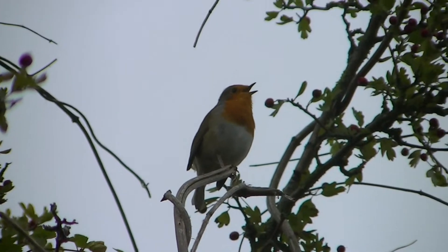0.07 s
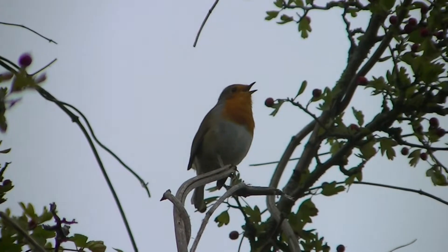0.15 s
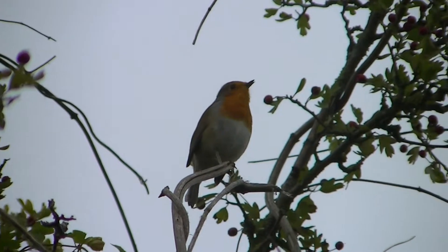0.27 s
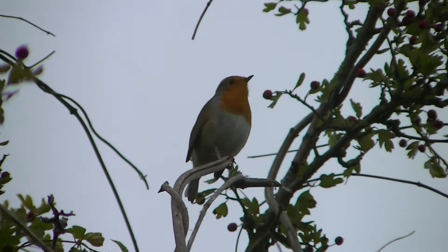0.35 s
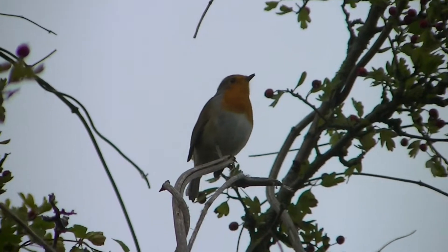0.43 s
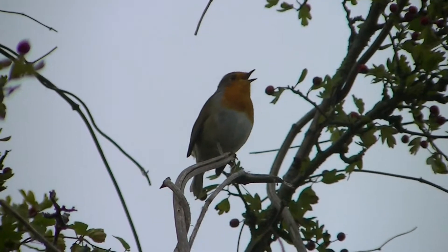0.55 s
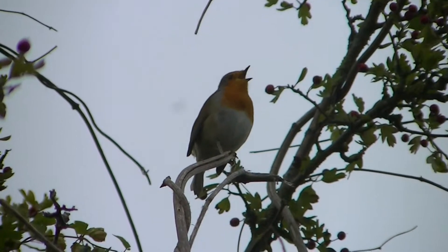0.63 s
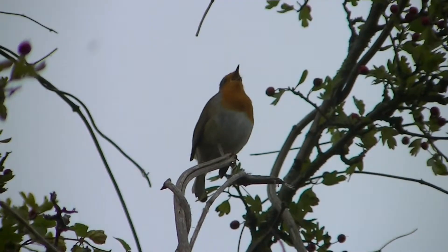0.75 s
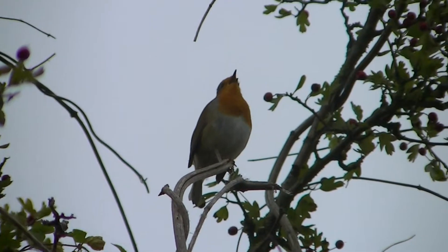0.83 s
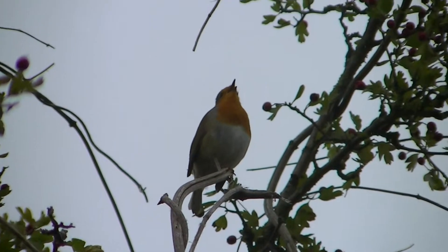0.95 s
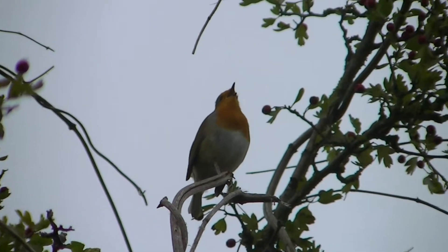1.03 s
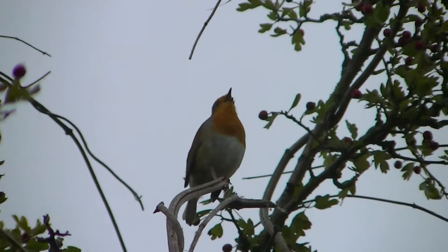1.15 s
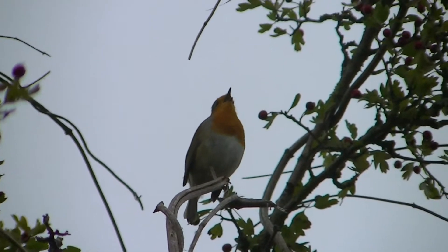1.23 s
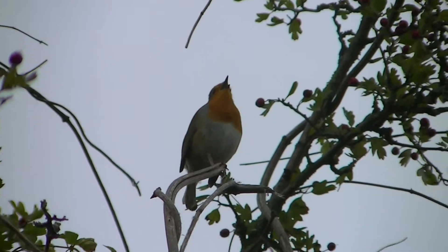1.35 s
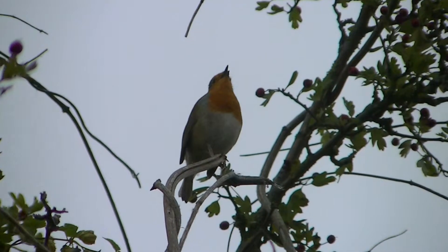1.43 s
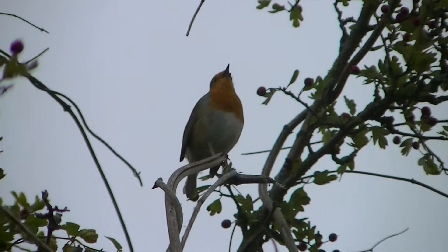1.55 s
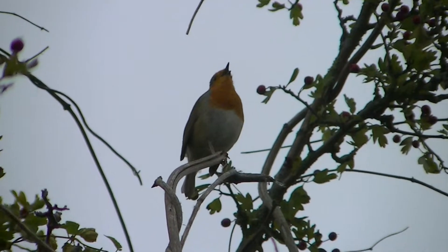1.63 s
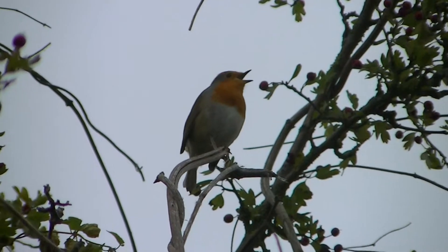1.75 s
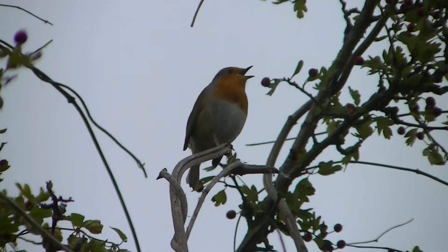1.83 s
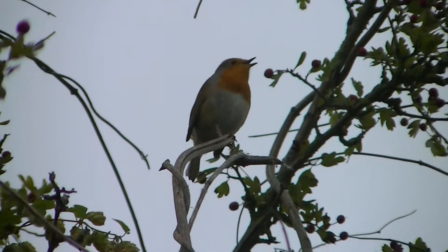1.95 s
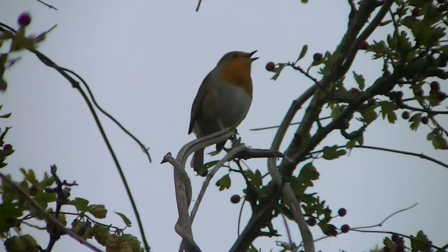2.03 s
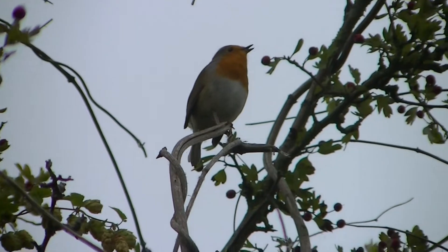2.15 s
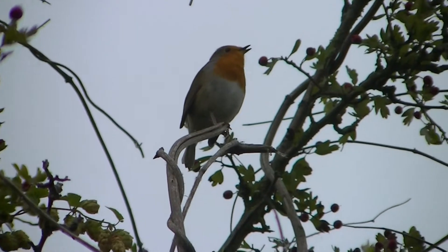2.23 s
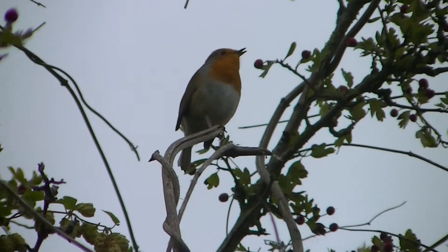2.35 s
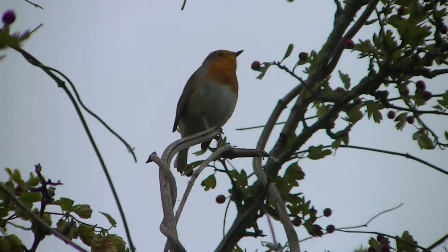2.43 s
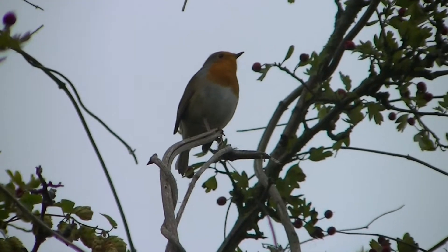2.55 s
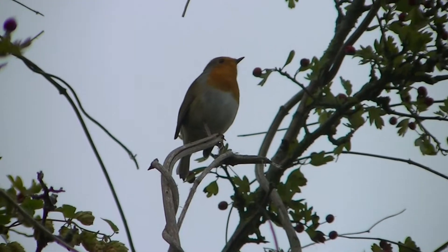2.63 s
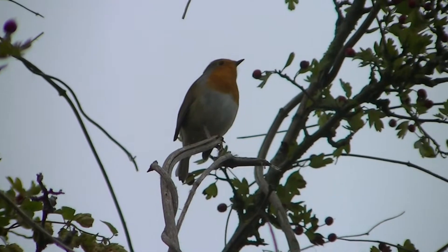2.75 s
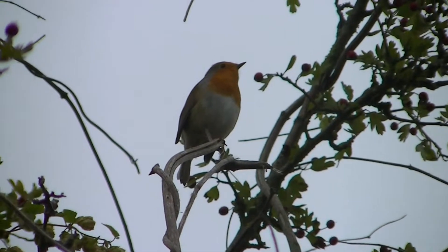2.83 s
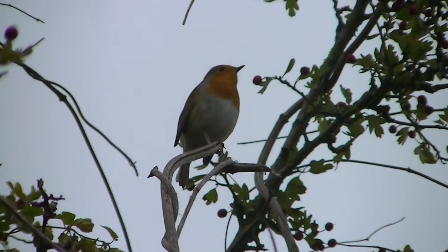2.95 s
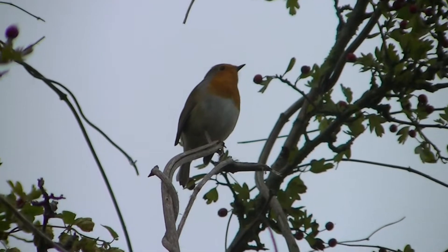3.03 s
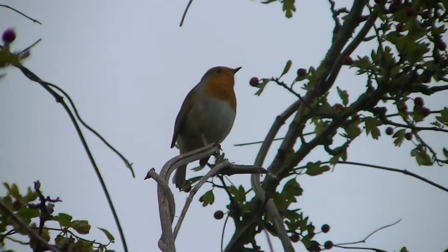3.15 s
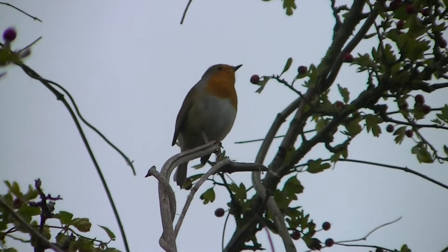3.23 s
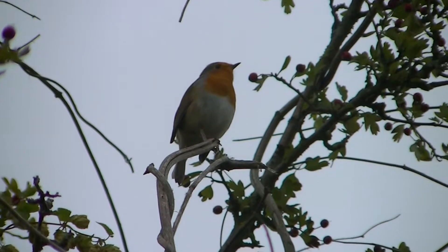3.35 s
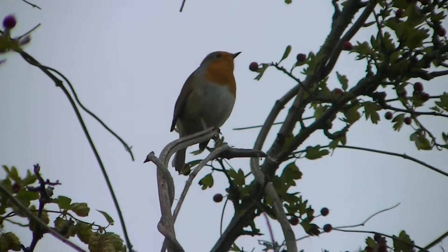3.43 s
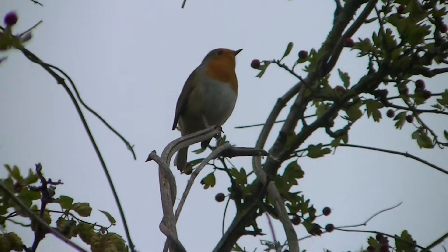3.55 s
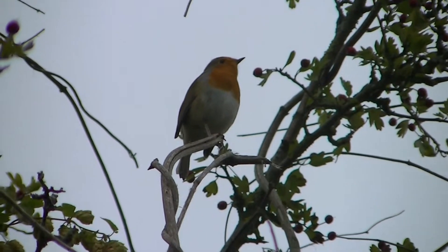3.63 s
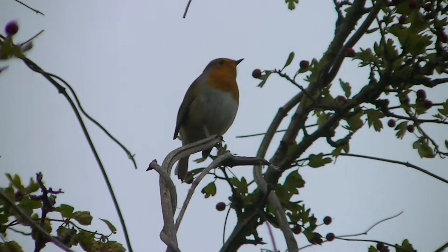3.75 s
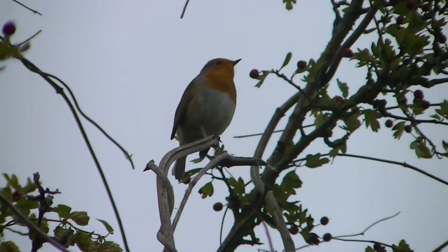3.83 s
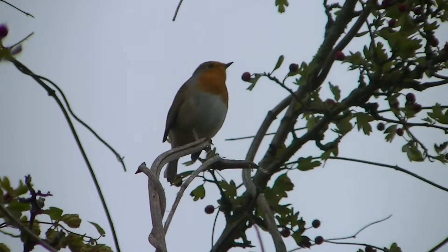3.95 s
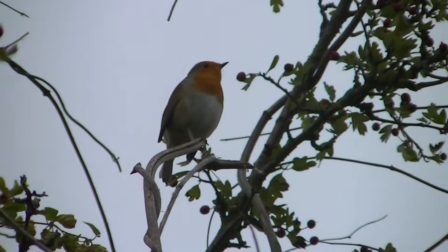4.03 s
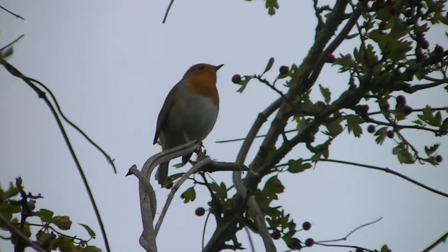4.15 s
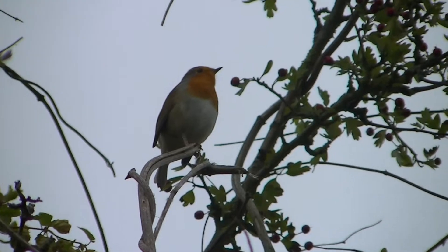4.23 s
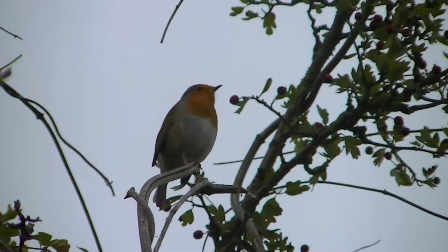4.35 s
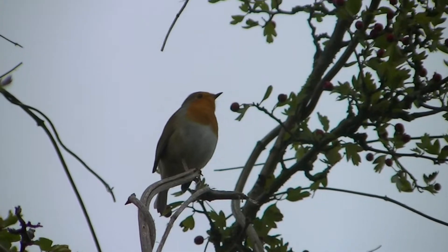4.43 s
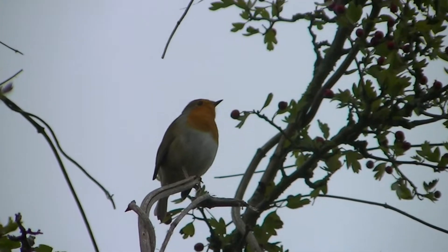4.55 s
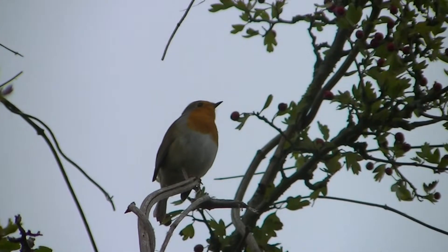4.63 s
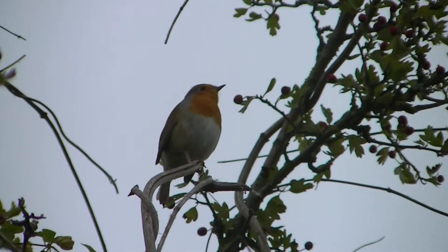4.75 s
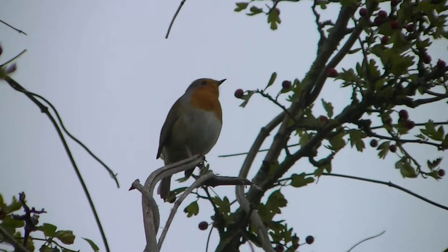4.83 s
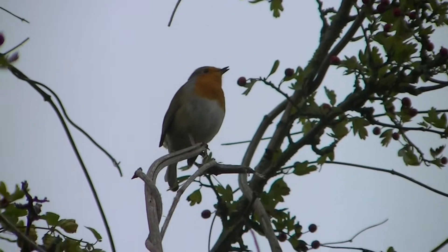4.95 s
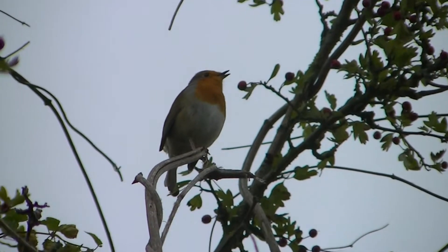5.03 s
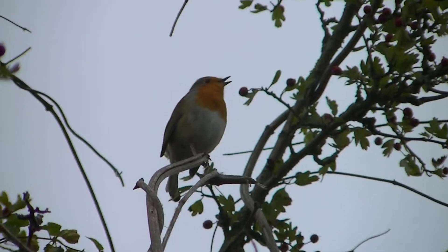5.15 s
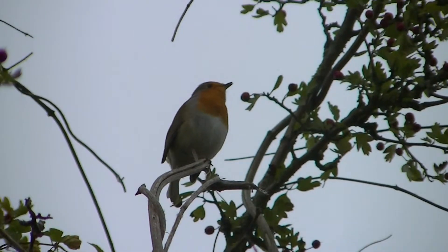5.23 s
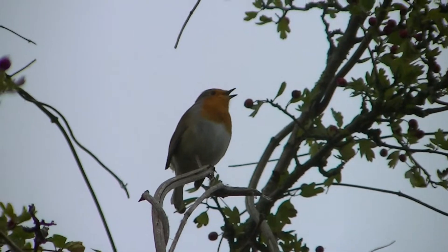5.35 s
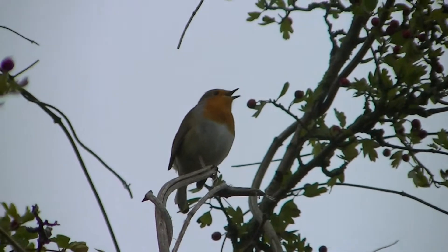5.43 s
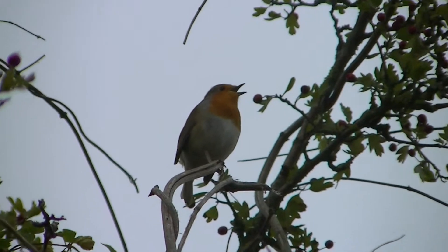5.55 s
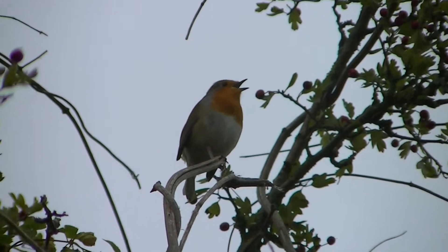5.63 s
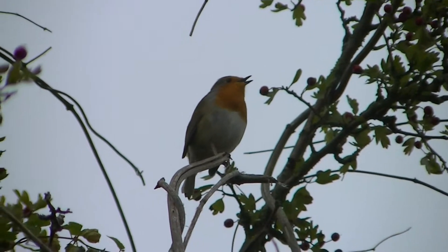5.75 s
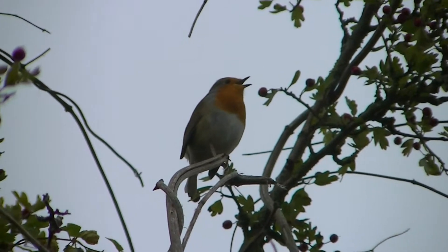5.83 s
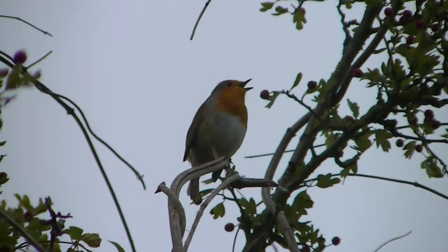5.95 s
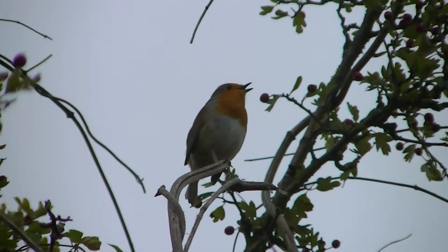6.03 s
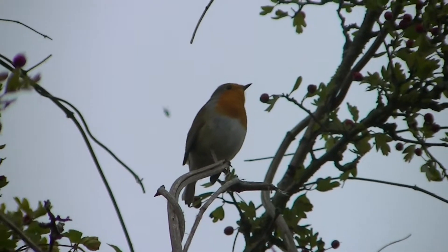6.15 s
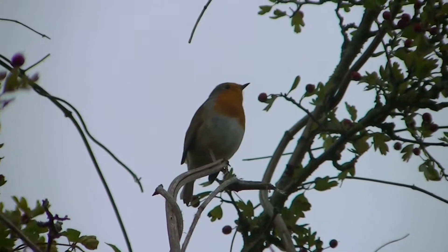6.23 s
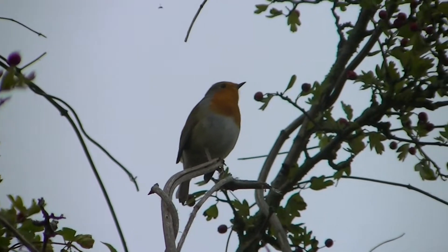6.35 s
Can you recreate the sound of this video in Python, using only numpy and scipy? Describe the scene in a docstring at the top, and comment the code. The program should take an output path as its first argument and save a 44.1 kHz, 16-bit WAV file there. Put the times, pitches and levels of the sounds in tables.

```python
"""Robin singing from a hedge

A robin sings a short chatter, a long two-voiced warble, a pause, then a thin, very high phrase.
Its syrinx whistles in short glides, rotating phasors that join or overlap; hard driving adds rasp, overtones, fizz.
Delayed echoes and decaying random taps stand for the ground, branches and twigs that throw the song back.
Filtered noise makes a nearly steady rush like far traffic and a fine hiss.
Faint ticks (filtered snaps) and blurred distant chirps (the same whistles) are heard mostly in the pause."""
import sys
import numpy as np
from scipy import signal
from scipy.fft import rfft, irfft
from scipy.io import wavfile
from scipy.ndimage import uniform_filter1d

SR = 44100
rng = np.random.default_rng(int(sys.argv[2]) if len(sys.argv) > 2 else 0)


def transcribe(signal):
    """Save signal, clipped to [-1, 1], as a 16-bit WAV file at the path in sys.argv[1]."""
    frames = np.atleast_2d(signal).T
    limited = np.clip(frames, -1, 1)
    pcm = np.round(limited * 32767).astype(np.int16)
    wavfile.write(sys.argv[1], SR, pcm)


N = 281358
TIME_S = np.arange(N) / SR


def gain_of(db):
    """Decibels to amplitude."""
    return 10 ** (np.asarray(db) / 20)


def evened(x):
    """Scales to an rms of one."""
    return x / np.sqrt(np.mean(abs(x) ** 2) + 1e-20)


def read(points, hz):
    """Reads a spectrum on a log-frequency axis."""
    point_hz, value = np.transpose(points)
    return np.interp(np.log(hz + 1), np.log(point_hz + 1), value)


def follow(points):
    """Reads a time curve at every sample."""
    return np.interp(TIME_S, *np.transpose(points))


def add(mix, start_s, sound):
    """Mixes a sound in at start_s, or at zero if that is negative."""
    part = mix[max(round(start_s * SR), 0):][:len(sound)]
    part += sound[:len(part)]


def band(x, low_hz, high_hz, order=2):
    """Butterworth band-pass."""
    edges_hz = [low_hz, min(high_hz, SR / 2 - 1)]
    return signal.sosfilt(signal.butter(order, edges_hz, "band", fs=SR, output="sos"), x)


def colour(x, spectrum):
    """Filters by a smooth spectrum."""
    hz = np.fft.rfftfreq(N, 1 / SR)
    return irfft(rfft(x) * gain_of(read(spectrum, hz)), N)


def unsteady(t):
    """A random wander of about unit size, 350 new values a second."""
    steps = rng.standard_normal(256)
    return np.interp((t - t[0]) * 350, np.arange(len(steps)), steps)


def scatter(x, delay_s, t60_s):
    """Many weak reflections of random sign that die away."""
    t = np.arange(SR // 2) / SR
    taps = rng.standard_normal(len(t)) * (rng.random(len(t)) < .1)
    taps = taps * (t > delay_s) * gain_of(-60 * t / t60_s)
    return signal.fftconvolve(x, evened(taps) / np.sqrt(len(t)))[:N]


def air(spectrum):
    """Steady coloured noise at unit rms: a shared mid and a weaker side signal."""
    # stereo width: (frequency [Hz], side against mid [dB])
    width = [(60, -15.5), (150, -20), (380, -20), (950, -29), (2380, -14.5), (5980, -8), (15000, -24)]
    hz = np.fft.rfftfreq(N, 1 / SR)
    mid, side = rfft(rng.standard_normal((2, N))) * gain_of(read(spectrum, hz))
    side = side * gain_of(read(width, hz))
    return evened(irfft(np.array([mid + side, mid - side]), N))


def background(rush_db=-39.5, hiss_db=-59):
    """A far rush that swells slightly, and a fine steady hiss, both filtered noise."""
    # noise colours: (frequency [Hz], relative density [dB per Hz])
    rush_colour = [(12, -43.5), (20, -11.5), (82, -8.5), (125, -0.5), (194, -3.5), (291, 0), (454, -3.5),
                   (667, 0), (962, 0.5), (1140, -1.5), (2000, -15), (2600, -31.5), (4400, -120)]
    hiss_colour = [(1180, -28), (2000, -2), (2680, -5.5), (2930, -4.5), (3960, -11), (4550, -11.5),
                   (6050, -16), (11700, -23), (15800, -28)]
    # swell of the rush: (time [s], level [dB])
    swell = [(0, 0), (1, 0.5), (2.1, -0.5), (2.6, 0.5), (3.7, .5), (4.6, 0.5), (5.2, -0.2), (5.7, -1.2),
             (6.38, 0)]
    rush = gain_of(rush_db + follow(swell)) * air(rush_colour)
    return rush + gain_of(hiss_db) * air(hiss_colour)


def far_chirp(dry_gain=0.61, wet_gain=0.6):
    """Distant birds: short gliding whistles, blurred by the trees between."""
    # (start [s], length [s], first, middle, last pitch [Hz], effort [dB], loudest point [share of length])
    glides = [(3.284, 0.021, 4870, 4690, 4560, -58, .5), (3.408, .03, 5120, 4800, 4600, -61, .5),
              (3.447, 0.1, 5450, 5600, 5460, -70, .5), (3.784, .038, 5650, 6980, 6500, -55.5, 0.47),
              (4.17, .09, 4300, 4380, 4350, -62.5, 0.45)]
    chirp = np.zeros(N)
    for glide in glides:
        start_s, tone = whistle(*glide)
        add(chirp, start_s, tone.real)
    return dry_gain * chirp + wet_gain * scatter(chirp, delay_s=.004, t60_s=0.2)


def ticks():
    """Small dry ticks in the hedge: a snap in a broad resonance, partly scattered by the twigs around it."""
    # (time [s], snap peak before the split [dB], pitch [Hz], scattered share [0-1])
    snaps = [(3.097, -27, 3120, 0.3), (3.371, -36, 3440, 0.75), (3.721, -33.5, 2500, 0.45),
             (5.477, -35.5, 4915, 0.53)]
    out = np.zeros(N)
    for start_s, peak_db, hz, wet in snaps:
        snap = band(signal.unit_impulse(SR // 4), hz * 0.72, hz * 1.22)
        snap = gain_of(peak_db) * snap / abs(snap).max()
        add(out, start_s, (1 - wet) * snap)
        add(out, start_s, wet * scatter(snap, delay_s=.0005, t60_s=0.028))
    return out


def whistle(start_s, length_s, first_hz, middle_hz, last_hz, effort_db, loudest,
            swing_hz=0, period_s=1, crest_s=0):
    """One whistled strand: a bowed glide under one swell, as a rotating phasor."""
    # the throat passes the middle of the range best: (pitch [Hz], gain [dB])
    throat = [(2300, -19), (3200, -11.5), (4200, -5), (5300, 0.5), (7300, -0.5), (8300, -7), (9500, -12)]
    onset_db, ending_db, valve_s = -11.5, -8, .0024  # swell ends; time the valve takes to open or shut
    waver, shimmer_db = .008, 1  # unsteadiness: share of the pitch, level
    t = np.arange(-valve_s / 2, length_s + valve_s / 2, 1 / SR)
    u = np.clip(t / length_s, 0, 1)
    loudest = np.clip(loudest, .02, .98)

    bow_hz = middle_hz - (first_hz + last_hz) / 2
    hz = first_hz + (last_hz - first_hz) * u + bow_hz * (1 - (2 * u - 1) ** 2)
    hz = hz + swing_hz * np.cos(2 * np.pi * (t - crest_s) / period_s)
    hz = hz * (1 + waver * unsteady(t))

    rise_db = onset_db * (1 - u / loudest) ** 2
    fall_db = ending_db * ((u - loudest) / (1 - loudest)) ** 2
    swell_db = np.where(u < loudest, rise_db, fall_db)
    opening = np.clip(np.minimum(t - t[0], t[-1] - t) / valve_s, 0, 1)
    valve = np.sin(np.pi / 2 * opening) ** 2
    level = valve * gain_of(effort_db + swell_db + read(throat, hz) + shimmer_db * unsteady(t))
    return start_s + t[0], np.sqrt(2) * level * np.exp(2j * np.pi * np.cumsum(hz) / SR)


def robin(flutter_hz=1300, third_db=-9):
    """All strands share one throat: returns the whistles, and the bright edge that hard driving adds."""
    # plain glides; some follow on within one longer note, others sound together as two voices or side tones:
    # (start [s], length [s], first, middle, last pitch [Hz], effort [dB], loudest point [share of length])
    slurs = [(0.0, 0.019, 3730, 3840, 3880, -20, 0.06), (0.002, 0.023, 5030, 4190, 4310, -19, 0.66),
             (0.017, 0.012, 3720, 2730, 2780, -26.5, 0.7), (0.021, 0.025, 4920, 4210, 3730, -20.5, 0.08),
             (0.052, 0.0036, 5430, 3720, 3420, -18, 0.16), (0.057, 0.0073, 3930, 4300, 3280, -14, 0.82),
             (0.06, 0.015, 6220, 4890, 4430, -27, 0.7), (0.125, 0.017, 5150, 4400, 4630, -23, 0.068),
             (0.128, 0.013, 4620, 3620, 4000, -19.5, 0.31), (0.138, 0.027, 4290, 4310, 3830, -20, 0.56),
             (0.142, 0.023, 3770, 3340, 2950, -21.5, 0.08), (0.16, 0.031, 3940, 4190, 3150, -22.5, 0.087),
             (0.204, 0.0088, 4120, 4150, 3940, -16, 0.08), (0.205, 0.033, 3510, 3670, 3980, -23, 0.08),
             (0.218, 0.023, 4510, 4270, 4100, -24.5, 0.63), (0.493, 0.014, 3960, 4520, 3550, -32.5, 1),
             (0.497, 0.015, 4230, 4780, 7600, -32.5, 0.98), (0.516, 0.031, 4480, 5750, 4900, -30.5, 1),
             (0.518, 0.021, 7560, 7130, 7970, -27, 0.15), (0.54, 0.021, 5770, 4170, 4750, -26.5, 0.099),
             (0.541, 0.024, 8370, 6280, 8460, -30, 0.08), (0.563, 0.015, 5400, 4750, 6100, -25, 1),
             (0.585, 0.015, 6700, 6380, 4860, -29, 0.85), (0.6, 0.012, 7020, 3720, 3630, -28, 0.38),
             (0.617, 0.027, 7300, 6110, 7400, -22.5, 0.56), (0.618, 0.009, 5150, 4260, 2900, -29, 0.25),
             (0.658, 0.029, 4160, 4090, 4240, -28, 0.92), (0.66, 0.046, 8140, 8190, 8120, -28, 0.92),
             (0.666, 0.03, 6440, 7500, 7520, -20, 0.36), (0.714, 0.029, 6850, 6200, 6260, -15.5, 0.93),
             (0.773, 0.025, 6330, 7180, 5900, -17, 0.55), (0.779, 0.028, 4480, 4230, 4450, -28, 0.83),
             (0.805, 0.021, 4160, 5416, 4930, -13.5, 0.39), (0.88, 0.019, 6160, 7510, 6940, -21, 0.22),
             (0.893, 0.021, 4700, 6050, 3930, -20.5, 0.93), (0.898, 0.018, 7730, 6360, 4000, -19.5, 0.77),
             (0.918, 0.03, 4490, 4330, 4640, -27, 0.41), (0.999, 0.025, 6360, 6680, 7800, -29, 0.39),
             (0.999, 0.021, 3800, 2920, 3800, -29.5, 0.19), (1.002, 0.024, 3243, 4500, 6300, -25, 0.86),
             (1.022, 0.021, 6040, 4460, 5370, -23, 0.08), (1.037, 0.046, 3560, 2680, 2210, -30, 0.74),
             (1.07, 0.012, 5600, 4600, 4300, -34, 0.92), (1.092, 0.018, 4120, 4770, 6000, -24.5, 0.58),
             (1.1, 0.029, 1920, 2700, 3420, -35, 0.33), (1.112, 0.027, 5960, 5910, 6740, -19.5, 0.33),
             (1.13, 0.022, 3720, 4840, 4470, -18, 1), (1.149, 0.036, 4310, 4820, 3370, -18, 0.21),
             (1.229, 0.011, 4280, 5140, 4300, -29, 0.92), (1.231, 0.022, 5960, 6960, 6900, -32, 1),
             (1.232, 0.013, 2930, 2510, 4030, -24, 1), (1.243, 0.013, 4700, 7660, 5300, -29.5, 0.13),
             (1.25, 0.056, 3220, 2590, 2260, -32, 0.92), (1.255, 0.029, 5330, 5810, 6020, -36, 0.09),
             (1.26, 0.03, 7500, 7160, 6800, -41, 0.79), (1.38, 0.019, 5750, 6630, 5980, -23.5, 0.23),
             (1.435, 0.0079, 5370, 5650, 5800, -31, 0.22), (1.508, 0.015, 6800, 7200, 6300, -41, 0.54),
             (1.516, 0.0068, 4480, 5070, 4700, -21, 0.61), (1.541, 0.0053, 3750, 3510, 3330, -20.5, 0.59),
             (1.542, 0.0087, 6620, 6900, 5240, -34, 0.22), (1.572, 0.008, 7400, 6700, 6020, -42, 0.5),
             (1.574, 0.0073, 5420, 4790, 4140, -22.5, 0.39), (1.591, 0.034, 7400, 6290, 5630, -21, 1),
             (1.612, 0.005, 4100, 4040, 4500, -25.5, 0.08), (1.679, 0.013, 5830, 6440, 5720, -18, 0.72),
             (1.692, 0.011, 6240, 5000, 3430, -16.5, 0.14), (1.706, 0.027, 3274, 3810, 3244, -19.5, 0.95),
             (1.728, 0.006, 3770, 3450, 2930, -21, 0.15), (1.759, 0.01, 6100, 6940, 7140, -27.5, 0.8),
             (1.778, 0.031, 7920, 7300, 6520, -19, 0.94), (1.809, 0.024, 6550, 6580, 6800, -17.5, 0.1),
             (1.869, 0.039, 6810, 7100, 6520, -22, 0.5), (1.917, 0.016, 6350, 6810, 6220, -30, 1),
             (1.934, 0.016, 6610, 6890, 6300, -28, 0.074), (2.011, 0.0082, 3810, 3800, 5400, -42, 0.08),
             (2.021, 0.011, 5100, 6020, 4830, -34, 0.6), (2.087, 0.0132, 5734, 5690, 4800, -28.5, 0.42),
             (2.285, 0.023, 4320, 4030, 5360, -27, 0.45), (2.304, 0.011, 4990, 4750, 4820, -25, 0.31),
             (2.316, 0.025, 4770, 4980, 4430, -24.5, 0.78), (2.341, 0.018, 4375, 4830, 5540, -30, 0.24),
             (4.95, 0.025, 8190, 8560, 7360, -41.5, 0.38), (4.965, 0.027, 7300, 7200, 6700, -45, 0.08),
             (4.989, 0.03, 9540, 8200, 8500, -36, 0.75), (5.019, 0.0096, 6760, 5940, 7330, -35.5, 1),
             (5.046, 0.011, 8270, 6900, 6300, -31, 0.9), (5.056, 0.011, 6600, 6250, 5200, -31.5, 0.78),
             (5.063, 0.02, 8500, 8500, 7500, -36.5, 0.83), (5.12, 0.006, 6230, 5800, 5000, -41, 0.15),
             (5.138, 0.031, 8800, 6820, 9260, -38, 0.45), (5.155, 0.051, 8210, 8260, 7000, -31.5, 0.094),
             (5.267, 0.019, 7450, 8300, 8650, -46, 0.73), (5.286, 0.034, 7760, 7600, 7440, -55, 0.3),
             (5.319, 0.022, 7700, 7140, 6900, -41.5, 0.92), (5.338, 0.019, 8250, 7900, 7030, -19.5, 0.95),
             (5.359, 0.04, 7490, 7390, 7040, -33.5, 0.08), (5.458, 0.0095, 6710, 6900, 7990, -38, 0.8),
             (5.466, 0.031, 7620, 8280, 7100, -22, 0.72), (5.588, 0.02, 7500, 7660, 6640, -20.5, 0.88),
             (5.61, 0.026, 6850, 7110, 6810, -19, 0.08), (5.628, 0.016, 6700, 8680, 6730, -27.5, 0.74),
             (5.643, 0.011, 6670, 6440, 6750, -24, 0.12), (5.677, 0.014, 7700, 8260, 7300, -26.5, 0.66),
             (5.799, 0.017, 7530, 7780, 7390, -26, 0.87), (5.814, 0.011, 7500, 8810, 6840, -19.5, 0.98),
             (5.825, 0.041, 6950, 7860, 7960, -24, 0.052), (5.865, 0.0078, 6670, 5170, 7420, -22, 0.57),
             (5.895, 0.013, 6430, 5010, 5620, -22.5, 1), (5.909, 0.0055, 5230, 6400, 5000, -31, 0.78),
             (5.914, 0.007, 5470, 4230, 3100, -24, 0.25), (5.942, 0.0061, 5340, 5300, 3200, -20.5, 0.19),
             (5.945, 0.008, 4660, 6800, 9000, -34, 0.079), (5.958, 0.0064, 6060, 6960, 7290, -28, 0.16),
             (5.971, 0.021, 7760, 7000, 7130, -23.5, 0.83), (6.031, 0.021, 5200, 6180, 3120, -34.5, 0.33),
             (6.034, 0.016, 7670, 6530, 5500, -29.5, 0.47)]
    # warbled glides: as above, then (swing [Hz], swing period [s], first crest after the start [s])
    trills = [(0.063, 0.049, 3550, 3630, 3210, -20, 0.087, 230, 0.018, 0.0042),
              (0.683, 0.049, 4510, 5715, 6440, -17.5, 0.9, 370, 0.017, 0.005),
              (1.037, 0.032, 5900, 6040, 5500, -18.5, 0.08, 140, 0.008, 0.0057),
              (1.24, 0.069, 3730, 4490, 6150, -22.5, 0.79, 190, 0.0224, 0.01),
              (1.385, 0.045, 4130, 5170, 3740, -18.5, 0.5, 240, 0.018, 0.011),
              (2.035, 0.067, 5320, 5780, 5040, -24, 0.35, 300, 0.049, 0.0061),
              (2.174, 0.063, 3200, 3607, 4330, -20, 0.53, 430, 0.055, 0.017),
              (5.093, 0.03, 7050, 6550, 6070, -34, 0.92, 360, 0.019, 0.021),
              (5.5, 0.11, 7650, 7330, 7640, -27.5, 0.14, 260, 0.025, 0.0048),
              (5.506, 0.08, 8070, 8000, 8040, -29.5, 0.08, 760, 0.019, 0.0024),
              (5.69, 0.056, 8090, 8300, 7200, -29.5, 0.08, 740, 0.018, 0.012),
              (5.69, 0.045, 8120, 7210, 7780, -24.5, 0.59, 40, 0.013, 0.012),
              (5.964, 0.062, 8450, 8040, 8030, -32, 0.63, 380, 0.0215, 0.007)]
    # low pitches are hoarse, high ones pure: (pitch [Hz], flutter against the tone [dB])
    hoarseness = [(2500, -12), (4000, -24), (5800, -26), (7600, -43)]
    # how hard the syrinx is pressed: (time [s], overtones added [dB])
    pressure = [(0, -4), (.07, 2), (.22, -4), (.55, 2), (.69, 6.5), (.735, -8), (.79, 1), (.93, 0.5),
                (1.01, 6.5), (1.06, 5.5), (1.15, 4), (1.245, 3.5), (1.3, 1.5), (1.72, 0), (1.8, -3.5),
                (2.35, -2.5), (5.5, 1.5), (6.05, -2)]
    # turbulence in the throat: (frequency [Hz], relative density [dB per Hz])
    fizz_colour = [(1500, -26), (3000, -7.5), (5000, -3.5), (8000, 6.5), (11000, -15), (15500, -7.5)]
    # what the beak lets through of the bright edge: (frequency [Hz], gain [dB])
    beak = [(1800, -21.5), (2800, -1), (5000, 2), (7500, 5), (9500, 3.5), (11500, -2), (13500, -3),
            (15500, -3.5)]
    overtone_db, side_tones_db, fizz_db = -37, 0.5, 4.5  # against the tone, the flutter, the octave
    duet_rasp_db, duet_overtone_db, duet_fizz_db = 7, 3, 3  # added when two pitches sound together
    rasp_per_pressure_db = 1.3

    voice = np.zeros(N, complex)
    for glide in list(slurs) + list(trills):
        add(voice, *whistle(*glide))
    loudness = np.sqrt(abs(uniform_filter1d(abs(voice) ** 2, size=130)) + 1e-10)
    shape = voice / loudness
    turn = uniform_filter1d(shape * np.roll(shape, 1).conj(), size=200)  # phase step per sample
    hz = abs(np.angle(turn)) * SR / (2 * np.pi)

    # duet is near 0 for a single pitch and near 1 while two pitches beat against each other
    beat = abs(shape) ** 2 - uniform_filter1d(abs(shape) ** 2, size=50)
    duet = np.clip(np.sqrt(2 * abs(uniform_filter1d(beat ** 2, size=400))), 0, 1)
    pressure_db = follow(pressure)

    # uneven vibration shakes loudness and phase; the beat adds tones above and below the two pitches
    rasp_db = read(hoarseness, hz) + duet_rasp_db * duet + rasp_per_pressure_db * pressure_db
    noise = rng.standard_normal(N) + 1j * rng.standard_normal(N)
    flutter = evened(band(noise, 150, flutter_hz, order=3))
    shake = flutter + gain_of(side_tones_db) * beat
    voice = voice * (1 + gain_of(np.minimum(rasp_db, -3)) * shake)

    # mixing the voice with itself gives the octave, the twelfth and the sums of the two pitches
    overtones = (voice * (shape + gain_of(third_db) * shape ** 2)).real
    edge_db = overtone_db + duet_overtone_db * duet + pressure_db

    # fizz grows with loudness and hoarseness
    turbulence = evened(colour(rng.standard_normal(N), fizz_colour))
    fizz = gain_of(fizz_db + duet_fizz_db * duet + .5 * rasp_db) * loudness * turbulence
    return voice.real, colour(gain_of(edge_db) * (overtones + fizz), beak)


def hedge(x, perch_db=-15, twigs_db=-14, trees_db=-23, side_db=-25):
    """Direct sound, single echoes from branches and ground, scatter from perch, twigs and farther trees."""
    # reflections of the song: (delay [s], level [dB])
    echoes = [(.0021, -21.5), (.0028, -23), (.0036, -23), (.00852, -7), (.0089, -30), (0.01, -19.5),
              (0.013, -15.5), (0.015, -17.5)]
    mid = x + sum(gain_of(db) * np.interp(TIME_S - delay_s, TIME_S, x, left=0) for delay_s, db in echoes)
    mid = mid + gain_of(perch_db) * scatter(x, delay_s=.0015, t60_s=0.021)
    mid = mid + gain_of(twigs_db) * scatter(x, delay_s=0.0089, t60_s=0.28)
    mid = mid + gain_of(trees_db) * scatter(x, delay_s=0.016, t60_s=0.26)
    side = gain_of(side_db) * scatter(x, delay_s=.001, t60_s=0.1873)
    return np.array([mid + side, mid - side])


def scene():
    """The robin in its hedge over the far rush and a fine hiss."""
    whistles, edge = robin()
    # the beak beams the bright edge; it arrives largely by way of the nearest twigs
    edge = gain_of(1.0) * (edge + scatter(edge, delay_s=.001, t60_s=0.037))
    return background() + far_chirp() + ticks() + hedge(whistles) + edge


def record(dry):
    """Band limit: a linear-phase low-pass at 15.9 kHz."""
    lowpass = signal.firwin(511, 15900, window=("kaiser", 9), fs=SR)
    return signal.oaconvolve(dry, lowpass[None], "same", axes=1)


dry = scene()
out = record(dry)
transcribe(out)
```